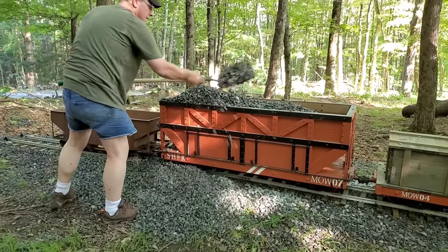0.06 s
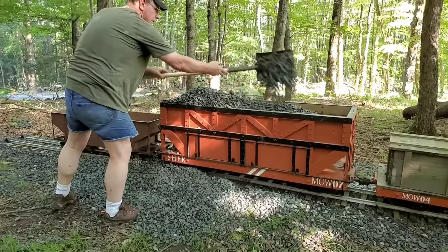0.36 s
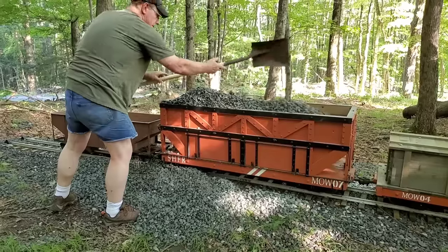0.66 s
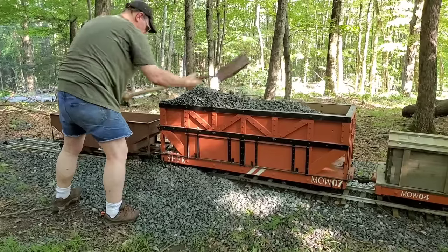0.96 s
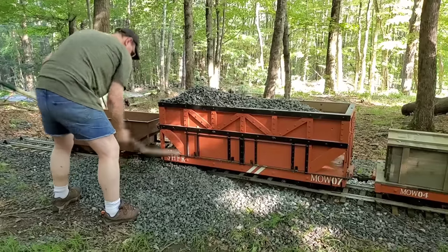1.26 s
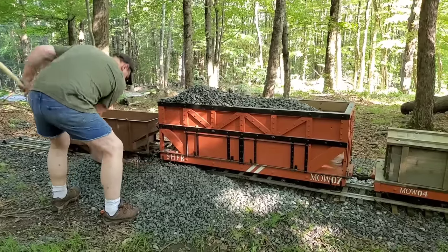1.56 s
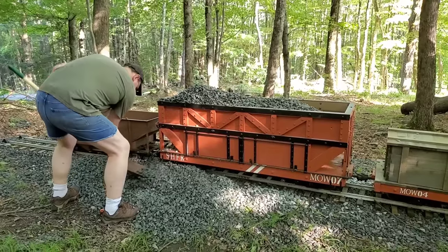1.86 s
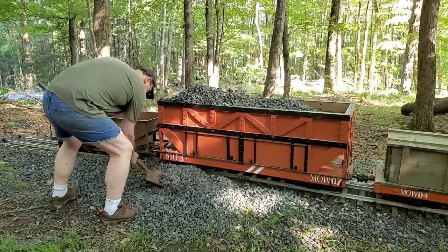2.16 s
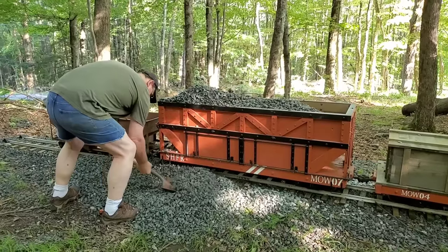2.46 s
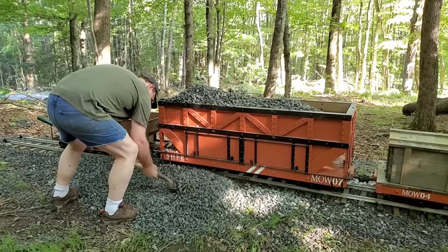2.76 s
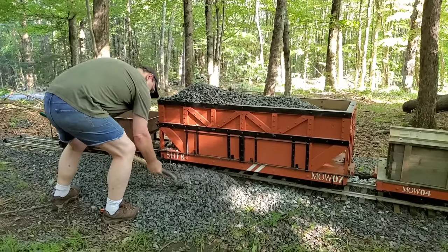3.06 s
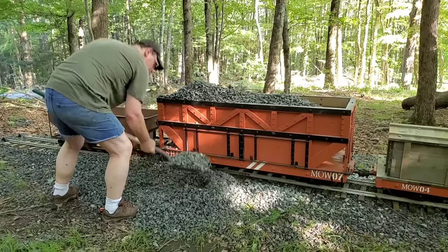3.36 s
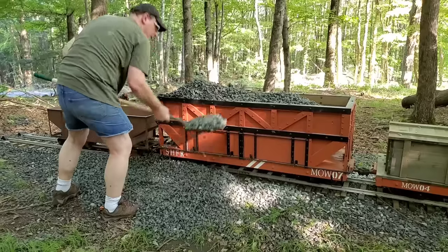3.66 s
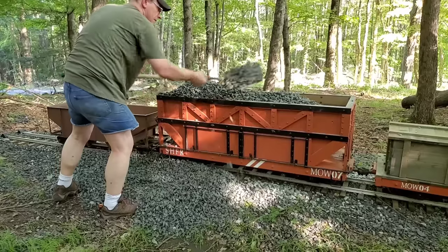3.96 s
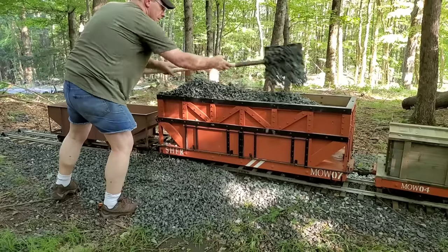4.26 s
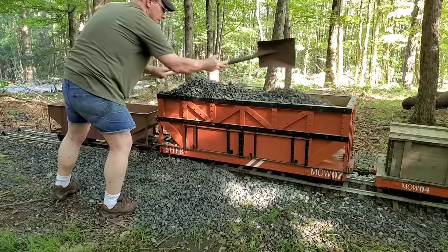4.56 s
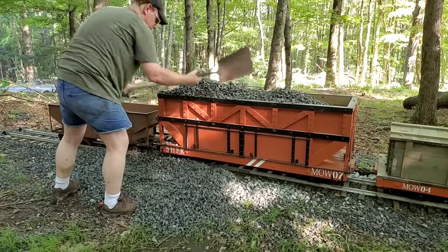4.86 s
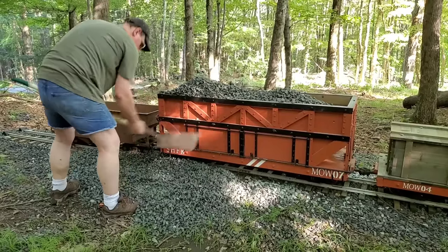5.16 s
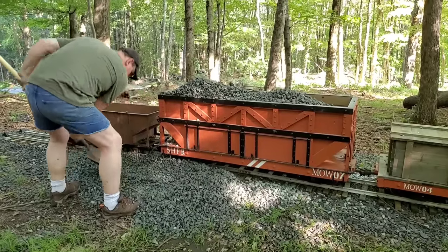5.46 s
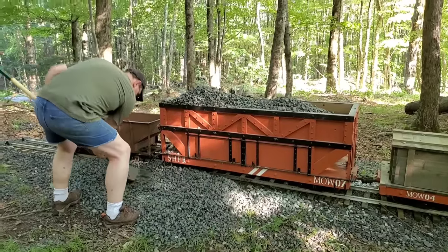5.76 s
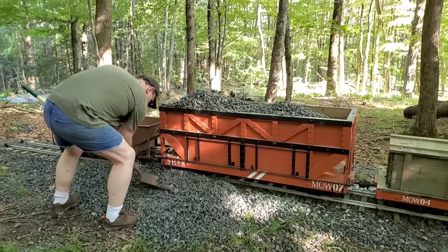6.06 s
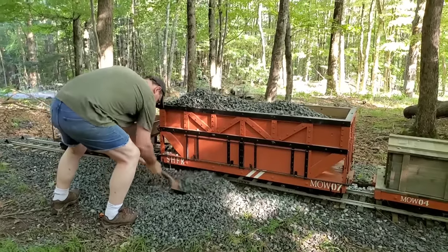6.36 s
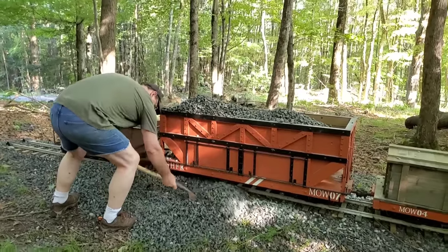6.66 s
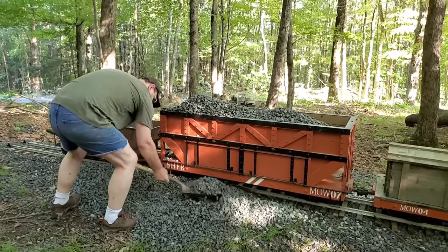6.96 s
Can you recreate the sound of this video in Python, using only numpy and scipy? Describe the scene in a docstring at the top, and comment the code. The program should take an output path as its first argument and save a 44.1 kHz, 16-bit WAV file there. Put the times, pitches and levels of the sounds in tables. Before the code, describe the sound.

Crushed stone slides off a steel shovel, the blade ringing lightly as the load clatters onto a heap in a small rail car. The shovel grinds into a gravel pile in several shoves, rises with grit rattling, and tosses a second load. It then digs again with a singing scrape. The work is heard in stereo from nearby, with a faint woodland echo over quiet air.

```python
"""In a wood, a steel shovel tosses crushed stone: the load slides off the ringing blade and clatters
onto the heap in a hopper car. From 1.6 s the blade is shoved into the pile, and stones grind under it.
It is lifted with grit rattling on the steel, and at 4.1 s a second load is tossed and lands.
From 5.6 s the blade digs again, its edge singing in a shallow scrape, and is raised once more.
Throughout, the trees return a faint tail over quiet outdoor air."""
import sys
import numpy as np
from scipy import signal
from scipy.fft import rfft, irfft
from scipy.io import wavfile
from scipy.ndimage import uniform_filter1d

SR = 44100
rng = np.random.default_rng(int(sys.argv[2]) if len(sys.argv) > 2 else 0)


def materialize(psi):
    """Save the field psi as 16-bit PCM at rate SR to the path in sys.argv[1].

    A 1-D psi becomes a single channel; in a 2-D psi each row is a channel.
    """
    bounded = np.clip(np.atleast_2d(psi).T, -1, 1)
    quanta = np.round(bounded * 32767).astype(np.int16)
    wavfile.write(sys.argv[1], SR, quanta)


N = 309582
TIME, FREQS = np.arange(N) / SR, np.fft.rfftfreq(N, 1 / SR)

# spectra of the air and of each kind of stone contact: f/Hz, level/dB
AIR_SPECTRUM = [(20, -34.5), (40, -22.5), (62, -2), (90, -16.5), (200, -23), (380, -24), (520, -22),
                (900, -33), (2500, -30.5), (4400, -29.5), (5600, -37.5), (9000, -44), (16000, -49)]
TUMBLE_SPECTRUM = [(400, -37.5), (900, -16.5), (1500, -1.5), (2200, -9.5), (3200, -3.5), (4500, -2),
                   (6500, -16), (12000, -23.5)]
GRIT_SPECTRUM = [(400, -23.5), (1100, -24), (2900, -11.5), (3700, -3.5), (4400, -8.5), (7500, -5.5),
                 (10500, -3.5), (12500, 1), (14000, 2), (15400, 2.5), (16200, 0.5)]
HEAP_SPECTRUM = [(200, -24), (340, -20.5), (500, -4.5), (700, -4.5), (880, -12), (1200, -6), (1600, -6),
                 (2200, -17.5), (3400, -12.5), (6000, -16.5), (16000, -37.5)]
GRIND_SPECTRUM = [(300, -42), (780, -2.5), (1030, -3.5), (1250, -7), (1630, -9), (1900, -4.5), (2250, -0.5),
                  (2800, 3.5), (3400, 4), (4000, -4), (5000, -3), (6600, -7.5), (9000, -12.5), (16000, -52)]
CRUNCH_SPECTRUM = [(30, -33), (60, 11.5), (100, -9.5), (170, -2.5), (280, -8.5), (450, -1), (750, -6.5),
                   (1300, -43), (5000, -89)]
# modes of the blade when free, damped by the pile, and scraped on its edge: f/Hz, width/Hz, level/dB
FREE_MODES = [(813, 34, -11), (1195, 34, -7), (1560, 34, 1), (1620, 34, 1), (1940, 28, 5), (2275, 32, -4),
              (2560, 24, -2), (3110, 40, -10), (3410, 44, -4), (4230, 30, -1), (4510, 40, -4),
              (5350, 36, -9), (6290, 60, -13)]
BURIED_MODES = [(1310, 210, 0), (1560, 220, -1.5), (3650, 700, -6)]
EDGE_MODES = [(3805, 130, 0)]
# the blade sheds its load: t/s, slide length/s, tumble fade/(dB/s), ring level/dB, swing level/dB
TOSSES = [(0.215, .35, 121, -40, -42.5), (4.078, 0.43, 58, -31, -48.5)]
# small stones snap against the steel: t/s, level/dB
TICKS = [(.0024, -7.5), (0.0858, -13), (0.2211, -4), (0.9198, -21.5), (1.0629, -20.5), (1.072, -24),
         (1.1573, -38), (1.206, -33.5), (3.46, -19.5), (3.508, -16), (3.5804, -12), (3.6553, -12),
         (3.7178, -12), (3.755, -12.5), (3.7668, -8.5), (3.8694, -6), (3.963, -17.5), (4.016, -8),
         (4.031, -11), (4.0613, -4), (4.1073, -4)]
# large stones bump on the blade, or drop on stone: t/s, level/dB, f/Hz, relative thump level/dB
BLADE_BUMPS = [(.027, -11.5, 1560, -5.5), (.094, -21, 1600, -20), (.203, -7.5, 3030, -27.5),
               (.276, -11.5, 1490, -26), (.321, -1, 1330, -2), (.361, -1.5, 3450, 2.5),
               (.607, -20.5, 1490, -3), (.638, -14, 1350, -12), (3.251, -12.5, 3530, -9),
               (3.889, -22.5, 4000, -24.5), (4.113, -11, 3260, -9), (4.141, -8.5, 3200, 3),
               (4.154, -10, 3420, -8), (4.196, -17.5, 1470, 1), (4.236, -5.5, 1380, 1),
               (4.273, -22, 3400, -21), (4.816, -14.5, 2900, -32)]
STONE_DROPS = [(.704, -16.5, 695, -13), (.722, -19, 1400, 1), (.762, -24, 705, -2.5),
               (.851, -27.5, 673, -7), (.951, -25, 1440, -15), (1.005, -40, 1510, -4),
               (1.157, -39, 1340, 2), (1.206, -44, 541, -15), (1.416, -42, 498, -15),
               (2.463, -15.5, 1360, -10), (4.048, -21, 1500, -21.5), (4.535, -17.5, 1300, -10),
               (4.562, -13, 1570, 1), (4.668, -21, 610, -13), (4.734, -12.5, 1460, 5.5),
               (4.878, -26.5, 1350, -10), (4.949, -32, 1710, -13), (5.113, -18, 1330, -2.5)]
# the bulk of a load lands on the heap: t/s, length/s, level/dB
LANDINGS = [(0.597, .14, -43.5), (4.479, 0.08, -37.5)]
# shoves into the pile: t/s, rise/s, length/s, grinding level/dB, relative grit level/dB
SHOVES = [(1.641, 0.023, .065, -31.5, -2.5), (1.689, 0.048, .052, -23, -1), (1.774, 0.0085, .055, -24.5, 2),
          (1.836, .01, .04, -28.5, 0.5), (1.883, 0.014, 0.16, -26.5, -2), (2.027, 0.0073, .22, -23.5, -5),
          (2.254, 0.1, .18, -27.5, -8), (2.61, 0.07, .1, -37, -9), (2.69, 0.042, 0.069, -18, -5.5),
          (5.584, 0.0084, 0.07, -31, -4), (5.657, .004, 0.033, -26.5, 0), (5.676, 0.075, 0.088, -22, 3),
          (5.779, 0.032, 0.17, -23, 0.5), (5.984, 0.12, 0.19, -22, -4), (6.198, 0.029, 0.092, -23, -2.5),
          (6.297, 0.031, .06, -21.5, -5.5), (6.378, 0.024, 0.072, -22.5, -7.5),
          (6.445, .02, 0.11, -30, -35)]
# the edge catches on a stone: t/s, level/dB, f/Hz
CLINKS = [(1.6553, -11, 3900), (2.2343, -11.5, 3300), (2.4438, -5.5, 4060), (2.633, -13.5, 3470),
          (3.316, -21, 3690), (3.3857, -21.5, 4870), (6.1483, -6.5, 2930), (6.2332, -7.5, 3200),
          (6.6144, -18, 3600), (6.6658, -14, 3730), (6.8603, -21.5, 3860), (6.9582, -17.5, 3750)]
# the loaded blade is raised: t/s, time in the pile/s, time to the top/s, drag level/dB, rattle level/dB
LIFTS = [(2.448, 0.97, 1.333, -45, -41.5), (6.299, .8, 1.2, -42, -41)]
# reverberation time of the wood: f/Hz, T60/s
WOOD_DECAY = [(150, .6), (700, 1.0), (3500, 1.05), (6000, .75), (15000, .56)]
# likeness of the two channels: f/Hz, coherence (clipped to 0..1 in use)
COHERENCE = [(100, 1.5), (700, 1.08), (1500, 0.34), (3000, -1), (5500, 0.01), (15000, 0.03)]
# balance of the two channels: f/Hz, left minus right level/dB
BALANCE = [(100, 2), (500, -4), (1100, 2.5), (1600, -0.5), (2600, 2), (3600, -9), (4500, -7.5), (5800, 5.5),
           (7000, 0.5), (8300, 9), (9500, 3.5), (11800, 1), (13500, 8.5), (15500, 22.5)]

CARRY_RISE_S, CARRY_FALL_DB_PER_S = .03, 253  # onset and release of a moving load's rattle
SLIDE_DB, CRUNCH_DB, YIELD_DB = -24, -42.5, -24.5
BAND_LIMIT_HZ = 15900


def amp(db):
    """Amplitude ratio of a level in decibels."""
    return 10 ** (np.asarray(db) / 20)


def read(points, hz):
    """Interpolation of a table on a logarithmic frequency axis."""
    f, value = np.transpose(points)
    return np.interp(np.log(hz + 1), np.log(f + 1), value)


def gains(spectrum, hz=FREQS):
    """Amplitude response of a tabulated spectrum."""
    return amp(read(spectrum, hz))


def unit(pair):
    """Normalisation: the mean of the two channels gets rms 1."""
    return pair / np.sqrt(np.mean(pair.mean(0) ** 2) + 1e-20)


def steadied(pair, size=2600):
    """Normalisation by the running rms: the flow is level, while single collisions stand out."""
    return pair / np.sqrt(abs(uniform_filter1d(pair.mean(0) ** 2, size)) + 1e-12)


def add(mix, start, sound):
    """Superposition of a sound on the mix from a given time."""
    part = mix[:, max(round(start * SR), 0):][:, :sound.shape[1]]
    part += sound[:, :part.shape[1]]


def swell(start, rise, length, fall, slope=0):
    """Envelope with a linear rise, a hold drifting at slope dB/s and exponential decay at fall dB/s."""
    t = np.maximum(TIME - start, 0)
    release_db = np.minimum(fall * np.maximum(t - length, 0), 200)
    return np.minimum(t / rise, 1) * amp(slope * np.minimum(t, length) - release_db)


def resonance(hz, pitch, q):
    """Response of a damped oscillator with quality factor q and peak gain 1."""
    return 1 / (1 + 1j * q * (hz / pitch - pitch / (hz + 1)))


def steel(modes):
    """Modal superposition: a sum of resonances, each squared for steep skirts."""
    return sum(amp(db) * resonance(FREQS, hz, q=hz / (1.5 * width)) ** 2 for hz, width, db in modes)


def stereo(pair, colour=1, lead_ms=0):
    """Partial coherence: two signals are filtered and blended, alike in the bass, unlike in the treble."""
    left, other = rfft(pair)
    coherence = np.clip(read(COHERENCE, FREQS), 0, 1)
    tilt = amp(read(BALANCE, FREQS) / 2)
    delay = np.exp(-2j * np.pi * FREQS * lead_ms / 1000)
    right = (coherence * left + np.sqrt(1 - coherence ** 2) * other) * delay
    middle = np.sqrt(tilt ** 2 + tilt ** -2 + 2 * coherence) / 2
    return irfft(np.array([left * tilt, right / tilt]) * colour / middle, N)


def burst(decay, rise, size=2048):
    """An impact excites dense, damped vibration; returns frequencies and a pair of spectra."""
    t = np.arange(size) / SR
    shape = (1 - np.exp(-t / rise)) ** 2 * np.exp(-t / max(decay, 1e-4))
    return np.fft.rfftfreq(size, 1 / SR), rfft(rng.standard_normal((2, size)) * shape / shape.max())


def blow(impact, colour, db):
    """Source and filter: an impact spectrum passes through a power-normalised response."""
    return irfft(impact * colour) / np.sqrt(np.mean(abs(colour) ** 2)) * amp(db - 10)


def contacts(per_s, spread_db, decay, clink_db, band_hz, count=26):
    """Shot noise: random collisions among stones of many sizes, each with its own broad resonance."""
    strength = amp(spread_db * np.minimum(rng.exponential(1, N), 3.5))
    hits = strength * (rng.random(N) < per_s / SR)
    stone, out = rng.integers(0, count, N), np.zeros((2, N))
    for k, pitch in enumerate(np.geomspace(*band_hz, count)):
        hz, impact = burst(decay * rng.uniform(.6, 2.5), rise=decay / 4)
        impact *= 1 + amp(clink_db) * resonance(hz, pitch, q=18)
        out += signal.oaconvolve((hits * (stone == k))[None], irfft(impact), axes=1)[:, :N]
    return out


def crowding(drive):
    """Power law of collision rate: a stronger stroke sets more stones in motion."""
    return (drive / drive.max()) ** .7


def air():
    """Ambient noise: quiet outdoor air with a distant low drone."""
    return amp(-63.5) * unit(stereo(rng.standard_normal((2, N)), gains(AIR_SPECTRUM)))


def toss_envelopes():
    """Gravity empties the swung and tipped blade; as the damping load leaves, the steel comes free."""
    swing, tip, flow, free = np.zeros((4, N))
    swing_s, ring_delay_s, ring_early_s = .27, .055, .049
    for start, length, fade, ring_db, swing_db in TOSSES:
        swing += amp(swing_db) * swell(start - swing_s, CARRY_RISE_S, swing_s, CARRY_FALL_DB_PER_S)
        tip += amp(-22.5) * swell(start, rise=.11, length=.11, fall=fade)
        flow += amp(SLIDE_DB) * swell(start, rise=.11, length=length, fall=91)
        ring_s = length - ring_delay_s - ring_early_s  # fades just before the last grit leaves
        free += amp(ring_db) * swell(start + ring_delay_s, rise=.22, length=ring_s, fall=133)
    loaded = np.minimum(flow * amp(9 - SLIDE_DB), 1)  # tumbling ends once the blade is empty
    return swing, tip * loaded, flow, free


def tossing(swing, tip, flow, free):
    """Impact excitation: the load tumbles and skids off the blade and sets its modes ringing."""
    roll = swing + tip + flow * amp(-25.5)
    slide = flow + swing * amp(-7)
    stones = contacts(1800 * crowding(roll), spread_db=4.5, decay=.0024, clink_db=10, band_hz=(1194, 6000))
    skid = contacts(5000 * crowding(slide), spread_db=1.5, decay=.0011, clink_db=3, band_hz=(3000, 15000))
    tumble = steadied(stereo(stones, gains(TUMBLE_SPECTRUM))) * roll * amp(-3.5)
    hiss = steadied(stereo(skid, gains(GRIT_SPECTRUM))) * slide
    ring = steadied(stereo(skid, steel(FREE_MODES), lead_ms=-.046)) * free
    return tumble + hiss + ring


def ticks():
    """Brief contact gives a wide spectrum: small stones snap glassily on the steel, with a short ring."""
    out = np.zeros((2, N))
    for start, db in TICKS:
        hz, snap = burst(decay=.0012, rise=.0006)
        _, ring = burst(decay=.005, rise=.001)
        colour = gains(GRIT_SPECTRUM, hz) * (1 + resonance(hz, 12400, q=9.4))
        add(out, start + .0012, blow(snap + amp(-18) * ring, colour, db))
    return stereo(out)


def knocks(rows, crack_db):
    """Heavy damping: large stones hit dead, with a broad resonance, a crack and a hollow thump."""
    out = np.zeros((2, N))
    for start, db, pitch, thump_db in rows:
        hz, impact = burst(decay=.0025, rise=.002)
        body = resonance(hz, pitch, q=2.9) / (1 + (hz / 5500) ** 4)
        thump = amp(thump_db) * resonance(hz, 620, q=6.1)
        bass_loss = 1 + (420 / (hz + 1)) ** 6
        add(out, start, blow(impact, (body + amp(crack_db) + thump) / bass_loss, db))
    return stereo(out, lead_ms=-.043)


def landing(tip, flow):
    """Inelastic collisions on the heap: first stones spill, the bulk clatters, the grit rumbles."""
    spill = tip * amp(-20.5)
    bulk = sum(amp(db) * swell(start, rise=.03, length=length, fall=115) for start, length, db in LANDINGS)
    falling = contacts(300, spread_db=3.5, decay=.002, clink_db=10, band_hz=(480, 2600))
    clatter = steadied(stereo(falling, gains(HEAP_SPECTRUM), lead_ms=-.037)) * (spill + bulk) * amp(8.5)
    stream = np.interp(TIME - .08, TIME, flow)  # the grit lands 80 ms after it slides
    rumble = steadied(stereo(falling, resonance(FREQS, 240, q=1.8) ** 2)) * stream * amp(-31.5)
    return clatter + rumble


def shove_envelopes():
    """Friction and yield: each shove bites, sags and stops; the crunch grows until the stones give way."""
    force, scrape, crunch = np.zeros((3, N))
    for start, rise, length, db, grit_db in SHOVES:
        bite = 1 + amp(-6.5) * np.exp(-np.maximum(TIME - start, 0) / .04)
        stroke = swell(start, rise, length, fall=194, slope=-15.5) * bite
        force = np.maximum(force, stroke * amp(db))
        scrape = np.maximum(scrape, stroke * amp(db + grit_db))
        crunch = np.maximum(crunch, stroke * amp(CRUNCH_DB + min(db - YIELD_DB, 0)))
    return force, scrape, crunch


def digging(push, rub):
    """Friction drives the blade: stones grind, grit scratches, the steel hums and its shallow edge sings."""
    stones = contacts(3200 * crowding(push), spread_db=1.5, decay=.0025, clink_db=9, band_hz=(960, 7080))
    grit = contacts(2400 * crowding(rub), spread_db=3.5, decay=.0024, clink_db=10, band_hz=(4160, 13700))
    grind = steadied(stereo(stones, gains(GRIND_SPECTRUM), lead_ms=.19)) * push * amp(-1)
    scratch = steadied(stereo(unit(grit) + unit(stones), gains(GRIT_SPECTRUM))) * rub
    # a lightly loaded blade rings more freely, so its hum falls more slowly than the grinding
    hum = steadied(stereo(stones, steel(BURIED_MODES), lead_ms=.15)) * push ** .85 * amp(-11.5)
    shallow = swell(start=6.06, rise=.29, length=1, fall=40)
    song = steadied(stereo(stones, steel(EDGE_MODES), lead_ms=.097)) * push * shallow * amp(-6)
    return grind + scratch + hum + song


def settling(crunch):
    """Granular shear: buried stones shift against each other with a low crunch."""
    slips = contacts(450, spread_db=3.5, decay=.0017, clink_db=24, band_hz=(122, 886))
    return steadied(stereo(slips, gains(CRUNCH_SPECTRUM), lead_ms=.18)) * crunch


def clinks():
    """Contact damping: the edge catches a stone and pings, choked at once by the pile."""
    out = np.zeros((2, N))
    for start, db, pitch in CLINKS:
        hz, impact = burst(decay=.0026, rise=.0008)
        ping = resonance(hz, pitch, q=9.2) + amp(-9) * resonance(hz, 1450, q=14)
        crack = amp(-22.5) * resonance(hz, 9000, q=.58)
        add(out, start, blow(impact, ping + crack, db))
    return stereo(out, lead_ms=.13)


def lift_envelopes():
    """Sliding friction drags stones until the blade is free; grit rattles more as the load gains speed."""
    drag, rattle = np.zeros((2, N))
    for start, buried_s, raised_s, drag_db, rattle_db in LIFTS:
        drag += amp(drag_db) * swell(start, rise=.65, length=buried_s, fall=CARRY_FALL_DB_PER_S)
        rattle += amp(rattle_db) * swell(start, CARRY_RISE_S, raised_s, CARRY_FALL_DB_PER_S, slope=4)
    return drag, rattle


def hopping(drag, rattle):
    """Rebound: loose stones hop on the rising blade, pinging as it drags and snapping as it rattles."""
    hops = contacts(40, spread_db=5.5, decay=.0015, clink_db=10.5, band_hz=(2850, 12440), count=6)
    modes = resonance(FREQS, 3750, q=9) + amp(-9) * resonance(FREQS, 1300, q=6)
    pings = unit(stereo(hops, modes, lead_ms=.13)) * drag * amp(-4)
    snaps = unit(stereo(hops, gains(GRIT_SPECTRUM))) * rattle * amp(-8)
    return pings + snaps


def wood(direct, echo_db, size=50000):
    """Scattering: trunks and leaves return sparse echoes that form a thin, late tail."""
    echoes = rng.standard_normal((2, size)) * (rng.random((2, size)) < 2500 / SR)
    hz, t, spectra = signal.stft(echoes, SR, nperseg=256)
    decay = amp(-60 * t / read(WOOD_DECAY, hz)[:, None])
    onset = 1 - np.exp(-t / .0086)
    _, tail = signal.istft(spectra * decay * onset, SR, nperseg=256)
    return amp(echo_db) * signal.fftconvolve(direct, tail / np.linalg.norm(tail[0]), axes=1)[:, :N]


def scene():
    """Superposition of the shovel work, its reverberation among the trees and the air."""
    swing, tip, flow, free = toss_envelopes()
    force, scrape, crunch = shove_envelopes()
    drag, rattle = lift_envelopes()
    work = digging(push=np.hypot(force, drag), rub=np.hypot(scrape, rattle)) + settling(crunch)
    work += tossing(swing, tip, flow, free) + landing(tip, flow)
    work += hopping(drag, rattle) + ticks()
    work += knocks(BLADE_BUMPS, crack_db=-10)  # bright on steel
    work += knocks(STONE_DROPS, crack_db=-40)  # dull on stone
    work += clinks()
    return work + wood(work, echo_db=-19) + air()


def record(dry):
    """Band limiting by a linear-phase low-pass filter."""
    lowpass = signal.firwin(401, BAND_LIMIT_HZ, window=("kaiser", 8), fs=SR)
    return signal.oaconvolve(dry, lowpass[None], "same")


dry = scene()
out = record(dry)
materialize(out)
```